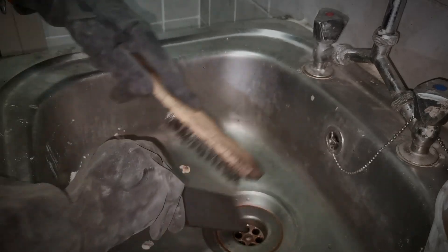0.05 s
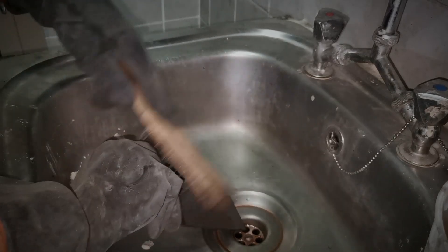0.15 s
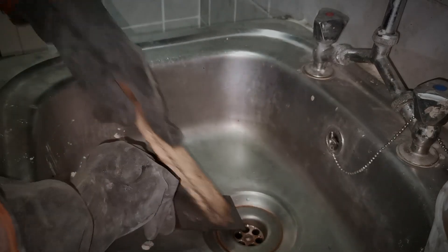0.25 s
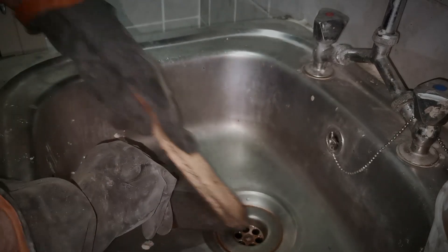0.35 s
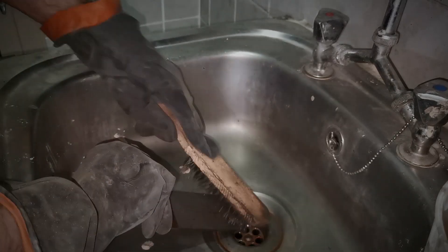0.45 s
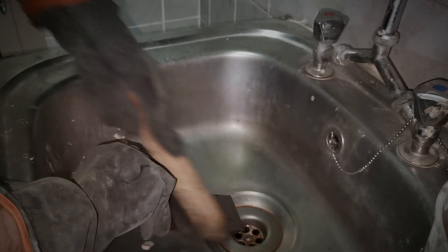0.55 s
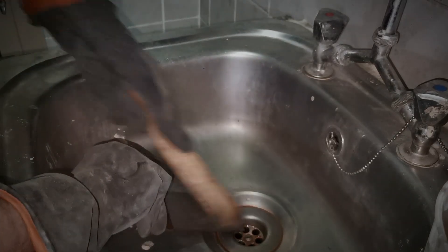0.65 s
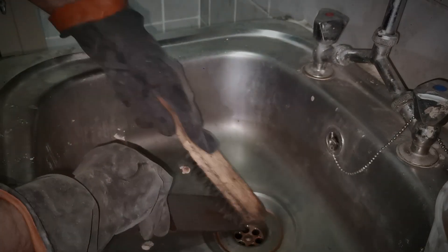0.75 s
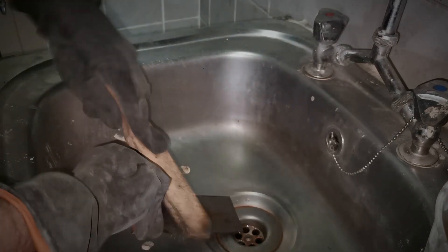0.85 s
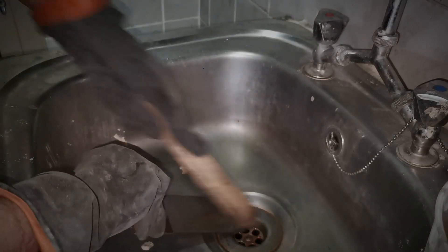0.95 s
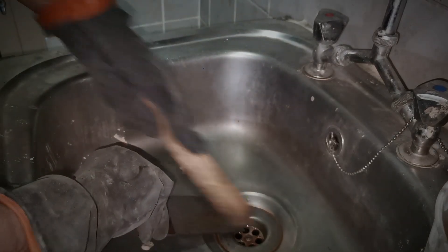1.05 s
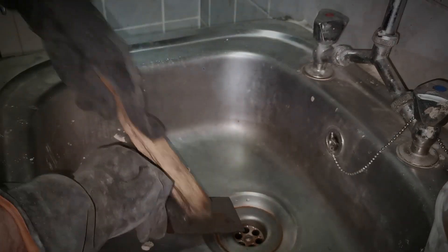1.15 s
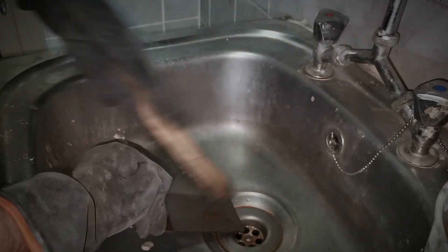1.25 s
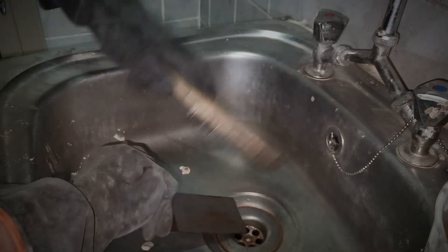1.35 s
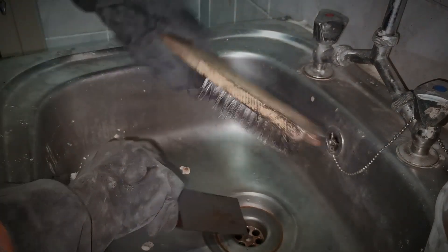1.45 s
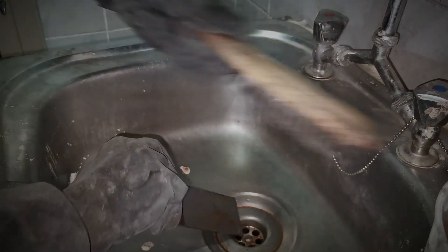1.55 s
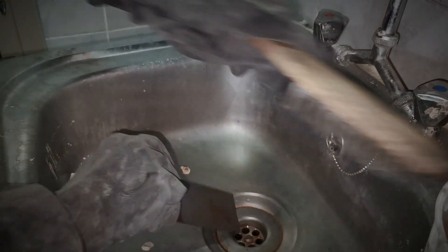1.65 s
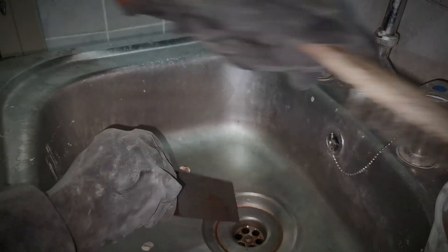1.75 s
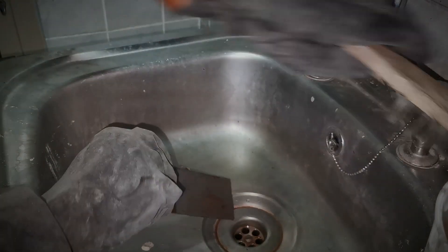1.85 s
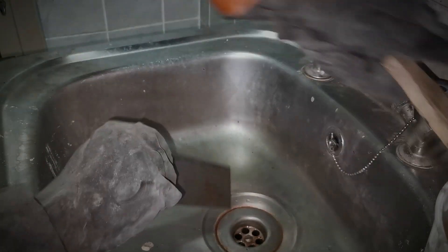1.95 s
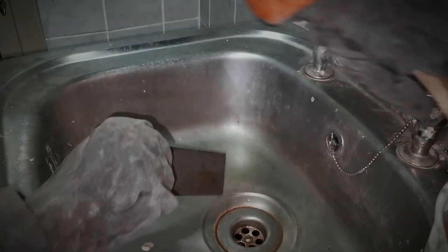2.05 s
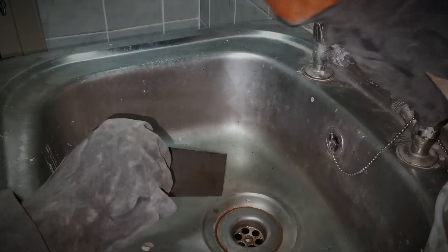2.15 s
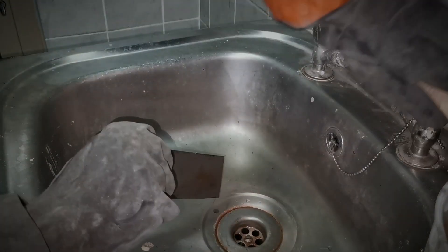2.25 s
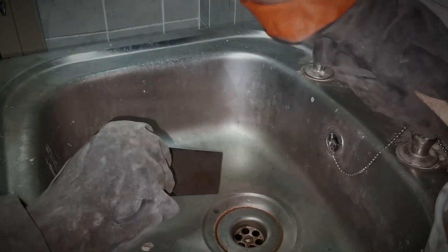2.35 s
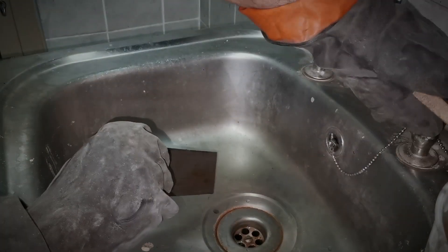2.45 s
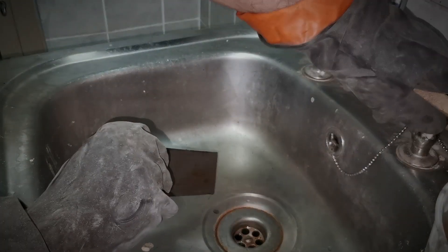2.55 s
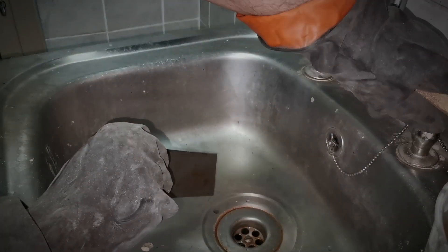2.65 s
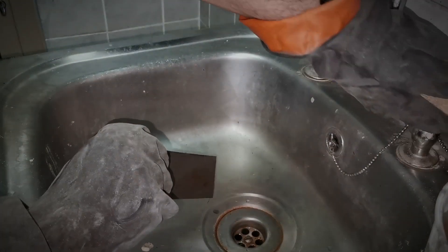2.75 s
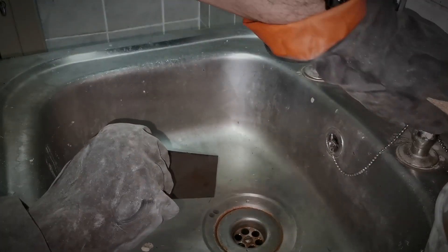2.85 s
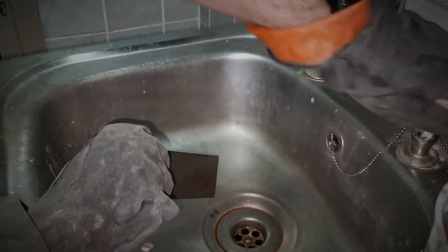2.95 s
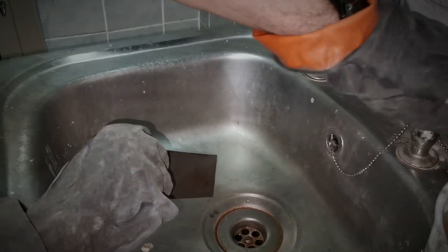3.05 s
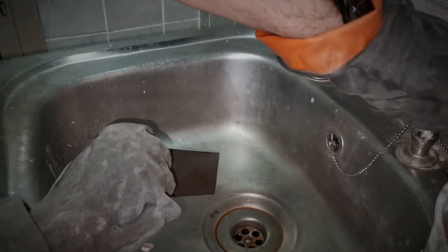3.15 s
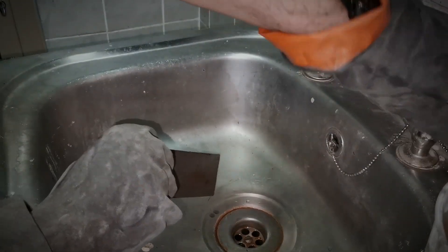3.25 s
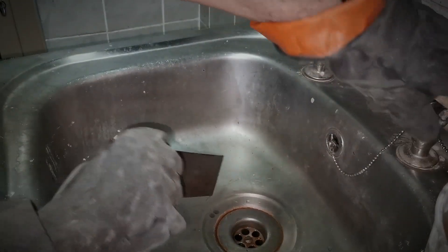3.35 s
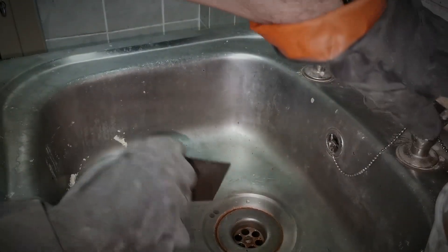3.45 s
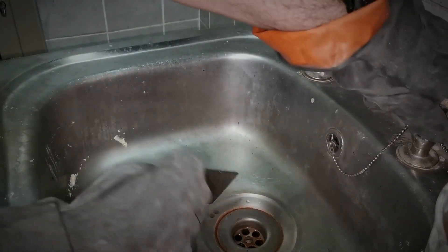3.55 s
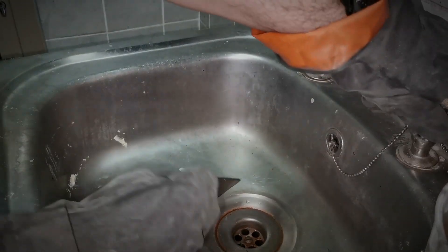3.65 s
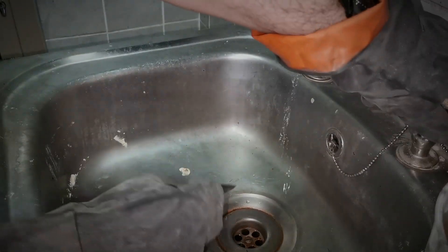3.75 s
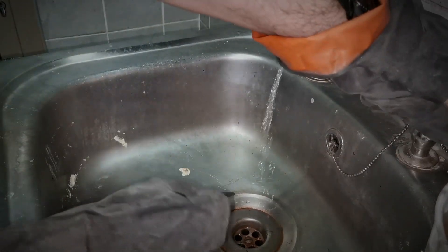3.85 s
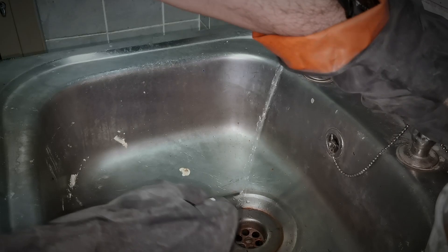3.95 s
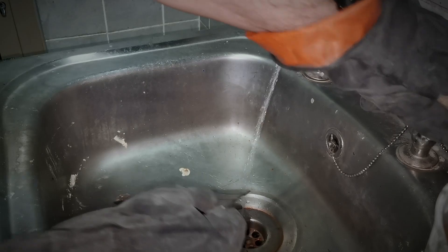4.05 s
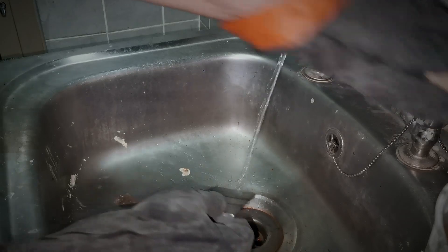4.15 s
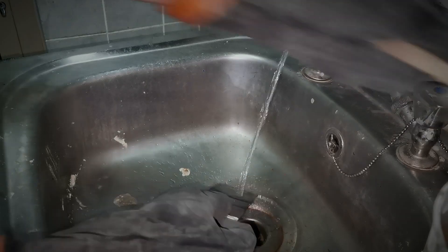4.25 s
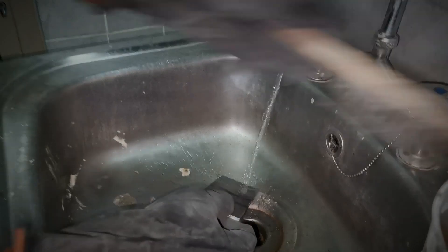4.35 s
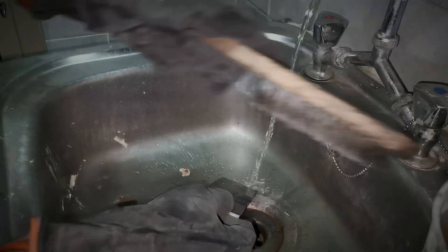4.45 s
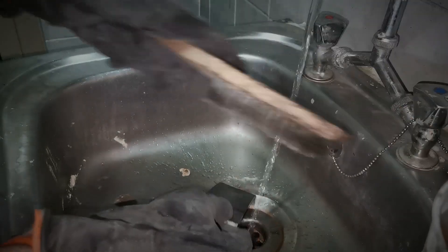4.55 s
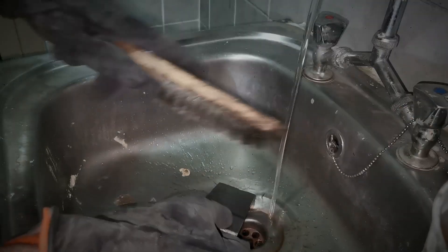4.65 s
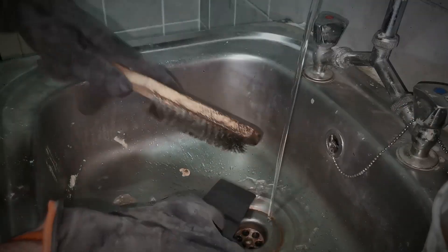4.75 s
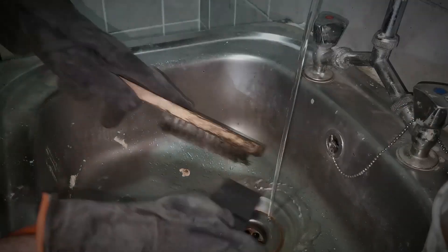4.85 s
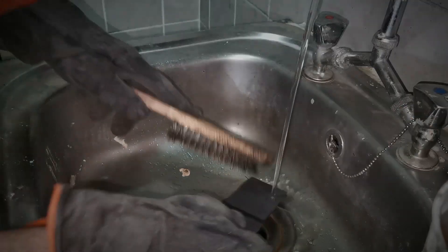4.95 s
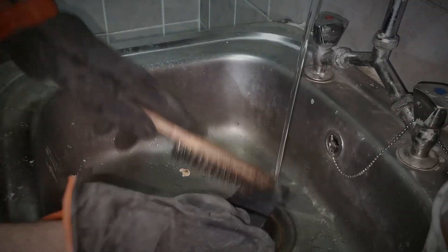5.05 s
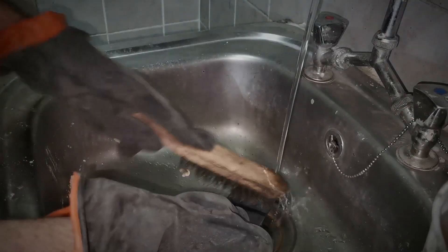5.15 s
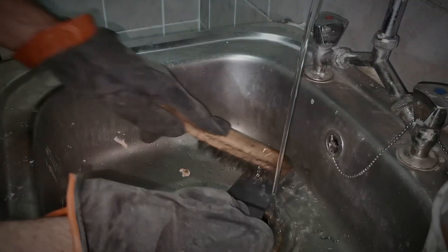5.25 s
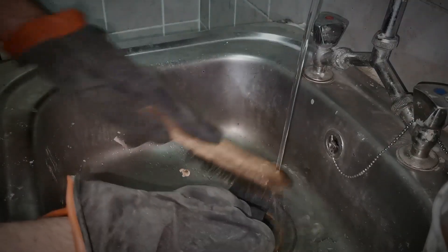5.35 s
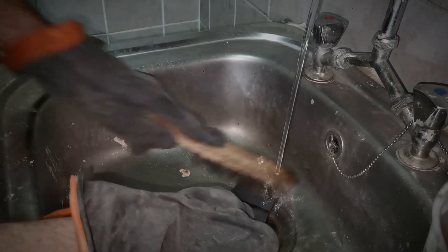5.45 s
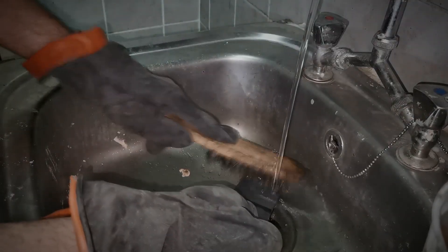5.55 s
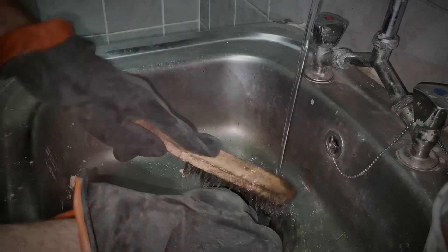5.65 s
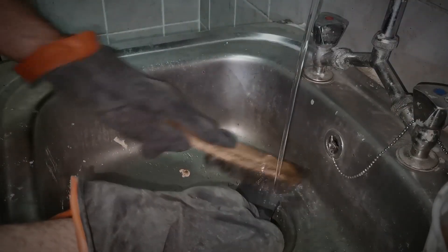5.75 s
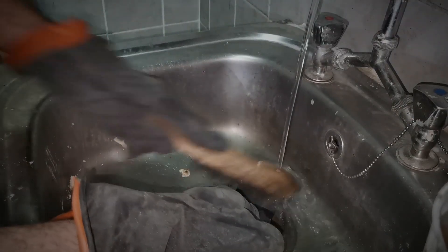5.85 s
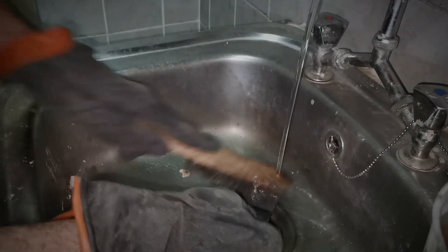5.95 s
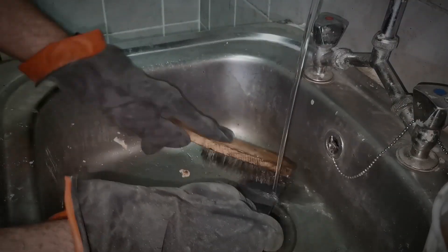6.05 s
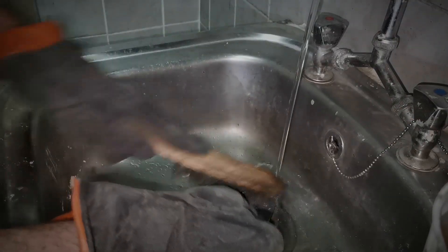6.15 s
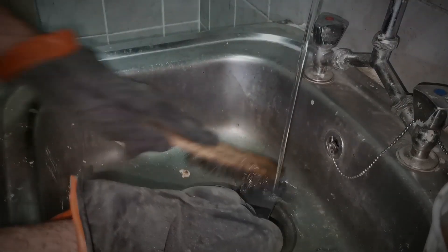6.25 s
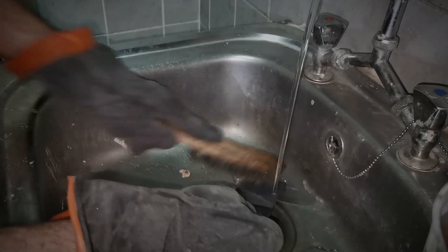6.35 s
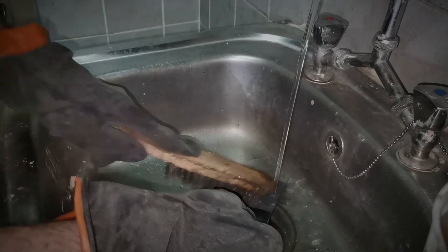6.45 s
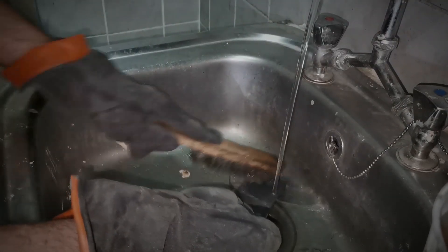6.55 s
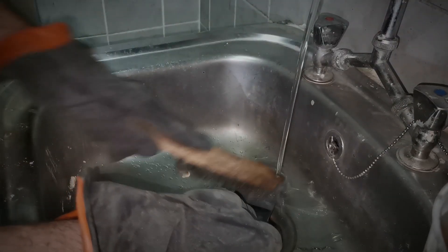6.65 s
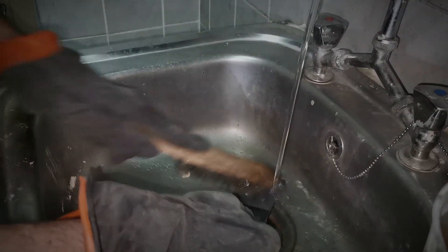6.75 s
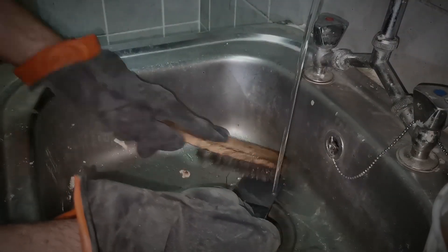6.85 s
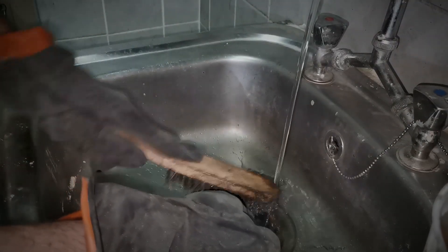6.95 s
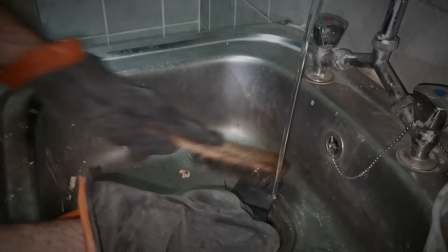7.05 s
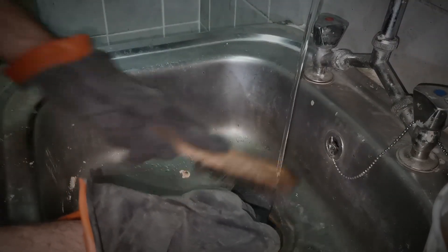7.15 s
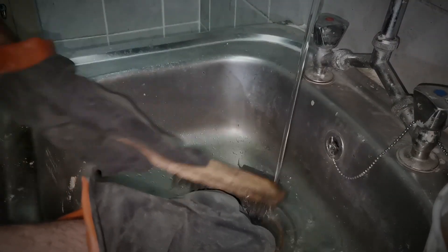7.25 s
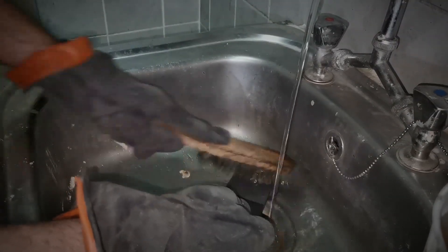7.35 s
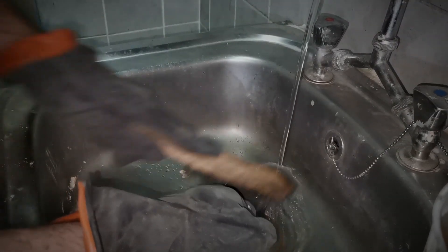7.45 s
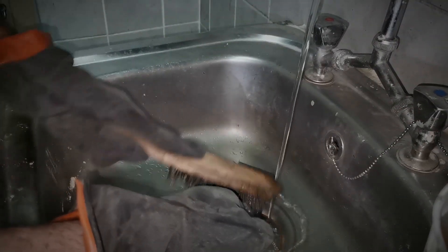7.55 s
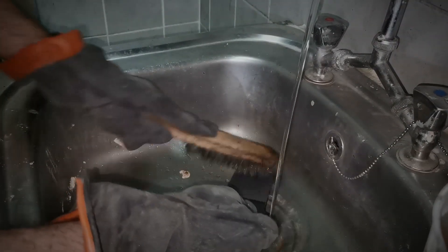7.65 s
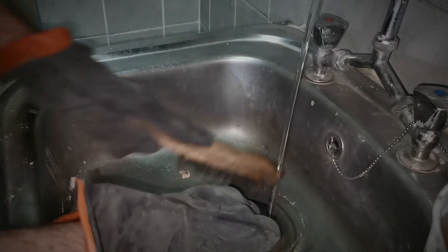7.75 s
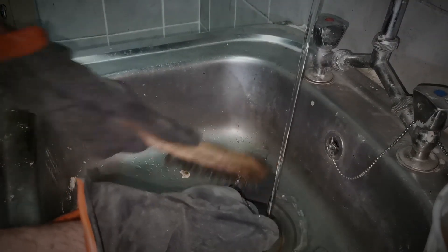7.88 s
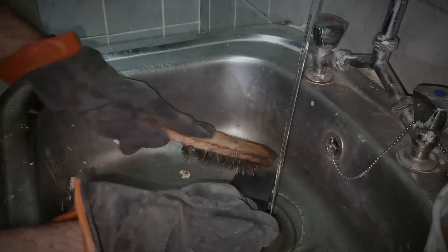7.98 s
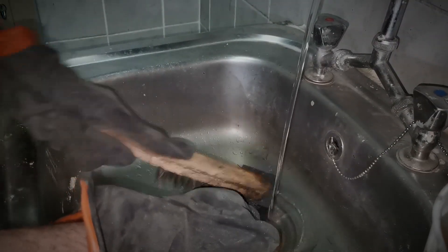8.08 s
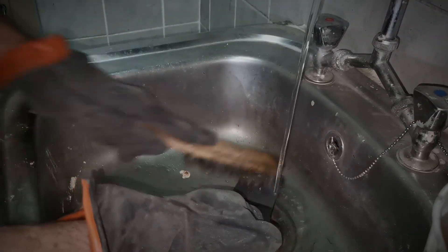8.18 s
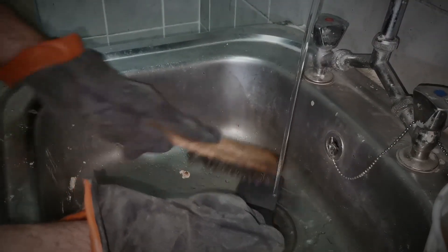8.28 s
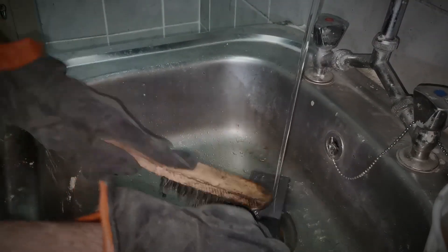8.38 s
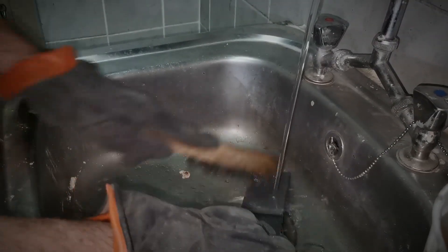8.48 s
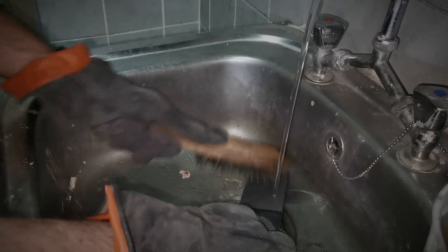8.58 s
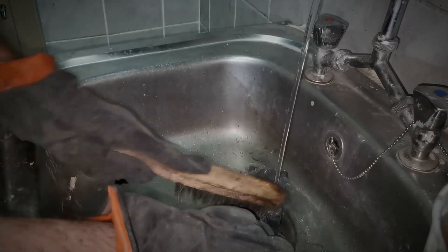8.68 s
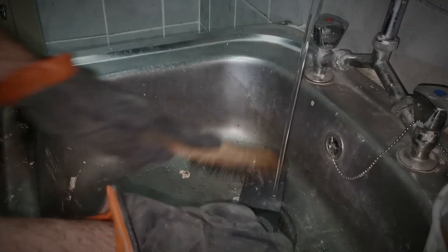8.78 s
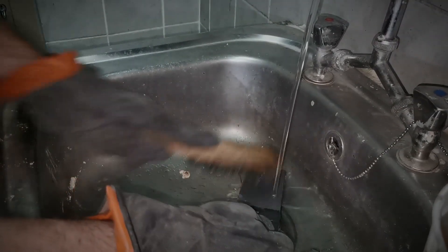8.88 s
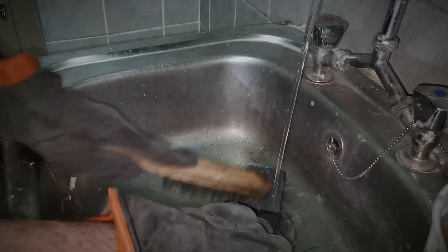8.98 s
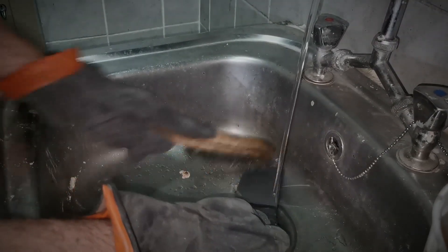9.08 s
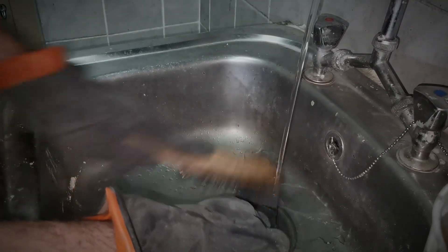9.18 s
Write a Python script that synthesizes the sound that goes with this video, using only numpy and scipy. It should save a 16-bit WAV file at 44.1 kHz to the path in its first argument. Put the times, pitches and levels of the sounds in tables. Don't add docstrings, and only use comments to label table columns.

```python
import sys
import numpy as np
from scipy import signal
from scipy.fft import rfft, irfft
from scipy.io import wavfile
from scipy.ndimage import uniform_filter1d

SR = 44100
rng = np.random.default_rng(int(sys.argv[2]) if len(sys.argv) > 2 else 0)


def volts_from_decibels(level):
    exponent = np.asarray(level, float) / 20
    return 10 ** exponent


def put_to_file(sound):
    columns = np.atleast_2d(sound).T
    safe = np.clip(columns, -1, 1)
    whole_steps = np.round(safe * 32767)
    wavfile.write(sys.argv[1], SR, whole_steps.astype(np.int16))


N = 406602
FREQ = np.fft.rfftfreq(N, 1 / SR)
TIME = np.arange(N) / SR
STREAM_ON_S = 5.25


def unit(x):
    return x / np.sqrt(np.mean(x ** 2, axis=-1, keepdims=True))


def on_log(table):
    hz, *columns = np.transpose(table)
    return np.array([np.interp(np.log(FREQ + 1), np.log(hz), c) for c in columns])


def band(x, lo_hz, hi_hz):
    return signal.sosfilt(signal.butter(3, [lo_hz, hi_hz], "bandpass", fs=SR, output="sos"), x)


def panned(pan_db):
    return np.array([[pan_db], [-pan_db]]) / 2


def walk(rate, channels=1, size=N):
    k = max(int(SR / rate), 1)
    steps = np.repeat(rng.standard_normal((channels, size // k + 1)), k, axis=1)[:, :size]
    return unit(uniform_filter1d(uniform_filter1d(steps, k), k))


def swells(table, rise, fall):
    out = np.zeros((len(table[0]) - 3, N))
    for t0, top, t1, *db in table:
        t1 = max(t1, top + .03)
        span = slice(int(t0 * SR), int(t1 * SR))
        up = np.clip((TIME[span] - t0) / max(top - t0, 1 / SR), 0, 1)
        down = np.clip((TIME[span] - top) / (t1 - top), 0, 1)
        shape = np.sin(np.pi / 2 * up) ** rise * np.cos(np.pi / 2 * down).clip(0) ** fall
        out[:, span] = np.maximum(out[:, span], volts_from_decibels(np.array(db))[:, None] * shape)
    return out


# (pitch [Hz], side minus mid [dB])
PORT_DIFFERENCE = [(60, -14), (110, -18), (200, -16.5), (380, -5), (700, -7.5), (1290, 3.5), (2380, -3),
                   (4400, -0.5), (8120, -17), (15000, 0)]


def widen(mid, other):
    side = irfft(rfft(other) * volts_from_decibels(on_log(PORT_DIFFERENCE)[0]), N)
    return np.array([mid + side, mid - side]) * volts_from_decibels(panned(-0.54))


def mottle(x, db, size=(7, 4)):
    spec = signal.stft(x, nperseg=512)[2]
    patches = uniform_filter1d(rng.standard_normal(spec.shape), size[0], axis=2)
    patches = uniform_filter1d(patches, size[1], axis=1)
    return signal.istft(spec * volts_from_decibels(db * patches / patches.std()), nperseg=512)[1][:, :N]


# (pitch [Hz], left [dB], right [dB])
PORTS = [(1190, 6, 9.5), (2740, -2.5, -1.5), (3660, -9, 0.5), (5070, -1.5, 5), (6190, -2, 0),
         (6810, -42, 6.5), (7500, -6, 8), (8600, -2.5, -3), (8860, 7, -10), (10500, 7.5, -7),
         (12040, 5, -2.5), (13700, -1.5, -1.5), (14500, 3, 4), (15900, 5.5, -0.5)]
# (pitch [Hz], width [Hz], level [dB])
BRISTLES = [(8800, 180, 1.5), (10800, 380, 2.5), (6600, 90, 2)]


def slips(share=.25, spread_db=0.5, patchy_db=1.6, mottle_db=3.0, cloth_db=0.):
    clicks = (rng.random((2, N)) < share) * rng.standard_normal((2, N))
    clicks = clicks * volts_from_decibels(spread_db * rng.exponential(size=(2, N)).clip(0, 5.0))
    colour = on_log(PORTS)
    for hz, width, db in BRISTLES:
        colour = colour + db / (1 + (2 * (FREQ - hz) / width) ** 2)
    colour = colour + cloth_db / (1 + ((FREQ - 4800) / 900) ** 2)
    patchy = mottle(clicks * volts_from_decibels(patchy_db * walk(120)), mottle_db)
    tips = irfft(rfft(patchy) * volts_from_decibels(colour), N)
    return unit(band(tips, 5850, 14640)), unit(band(tips, 2200, 4250))


def shaken(modes, wander_db, lo_hz, hi_hz, rumble_db, steady=0.7, size=32):
    swing, coarse = 0, TIME[::size]
    for hz, db, t60 in modes:
        a, b = walk(size * 8.5 / t60, channels=2, size=len(coarse))
        favour_db = wander_db * walk(size * 11, size=len(coarse))[0]
        gain = volts_from_decibels(db + favour_db) / (np.hypot(a, b) + 0.3) ** steady
        phasor = np.interp(TIME, coarse, gain * (a + 1j * b))
        swing = swing + (phasor * np.exp(2j * np.pi * hz * TIME)).real
    rumble = unit(band(rng.standard_normal(N), lo_hz, hi_hz))
    swing = unit(unit(swing) + volts_from_decibels(rumble_db) * rumble)
    return np.array([swing, np.roll(swing, N // 2)])


# (pitch [Hz], level [dB], t60 [s])
DRUM = [(140, 1.5, .3), (71, -20, 0.15)]
WALL = [(197, -34, 0.19), (216.6, 2.5, 0.27), (246, 0, 0.2), (275, -7, 0.17), (297, -2, 0.32)]
RIM = [(414.3, 11.7, 0.35), (486, 1.4, 0.21), (541.5, 4.2, 0.2)]
TAP = [(641.6, -3.5, 0.26), (709, 1.5, 0.15), (850, -16, 0.22), (890, -10.5, 0.18), (980, -11.5, 0.32),
       (1117, -14.5, 0.22)]


def shaken_basin():
    dry_db, wet_db, climb_db_s = -2, -15, 3
    tap_db = np.where(TIME < STREAM_ON_S, dry_db, wet_db + climb_db_s * (TIME - STREAM_ON_S))
    high = volts_from_decibels(tap_db) * shaken(TAP, 5.5, 611, 785, -4.5)
    drum = shaken(DRUM, 0.87, 44, 160, -28)
    lower = 0.78 * shaken(WALL[:3], 2.1, 144, 275, -10.0)
    upper = 0.63 * shaken(WALL[3:], 1.17, 250, 366, -8.5)
    return [drum, lower, upper, 0.85 * (shaken(RIM, 3.8, 386, 560, -3.0) + high)]


# (pitch [Hz], level [dB per Hz])
ROOM = [(12, -11), (20, -3.5), (43, -4), (68, -8.5), (86, -8.5), (142, -3.5), (168, -12), (367, -23),
        (738, -28), (1150, -30.5), (2530, -37), (2990, -46.5), (16000, -57)]


def room():
    air = irfft(rfft(rng.standard_normal((2, N))) * volts_from_decibels(on_log(ROOM)), N)
    return volts_from_decibels(-45.5 + 0.13 * walk(4.7)) * widen(*unit(air))


# (time [s], glove rustle [dB], basin murmur [dB])
HANDS = [(0., -56.5, -49), (1.44, -55.5, -38), (1.73, -54, -45), (1.92, -60, -96), (2.35, -62, -34),
         (2.66, -69.5, -47.5), (2.93, -67.5, -64), (3.389, -58.5, -43), (3.55, -71, -48),
         (3.87, -63.5, -43), (4.05, -57.5, -47), (4.21, -54, -38.5), (4.4, -46, -65), (4.59, -57, -67),
         (4.75, -45.5, -37), (4.9, -52, -49), (5.08, -53, -51), (5.3, -42, -45)]
# (start [s], fastest [s], end [s], rustle [dB], left minus right [dB])
RUBS = [(2.107, 2.093, 2.26, -42, 1), (2.153, 2.335, 2.55, -39.5, 0), (2.52, 2.511, 2.6, -49.5, -4),
        (2.598, 2.601, 2.65, -46.5, 4), (3.377, 3.384, 3.43, -42, -3), (3.452, 3.473, 3.55, -44, 0),
        (3.54, 3.62, 3.79, -48, 1), (4.083, 4.095, 4.2, -49, 10), (4.142, 4.158, 4.21, -45.5, 6),
        (4.364, 4.403, 4.51, -32.5, 0.5), (4.795, 4.794, 4.9, -37, -2), (5.23, 5.255, 5.3, -38, 8)]


def handling(basin):
    rasp, scrape = slips(share=.3, spread_db=2.0, patchy_db=2.0, mottle_db=1.0, cloth_db=3.5)
    s, *levels = np.transpose(HANDS)
    fade_db = 400 * (TIME - s[-1]).clip(0)
    hiss_db, murmur_db = (np.interp(TIME, s, c) - fade_db for c in levels)
    rows = []
    for *t, db, pan_db in RUBS:
        scuff_db = -58 + 1.76 * (db + 42.5)
        rows.append((*t, db + pan_db / 2, db - pan_db / 2, scuff_db))
    rub = swells(rows, rise=.5, fall=2.5)
    rustle = np.hypot(volts_from_decibels(hiss_db + panned(3)), rub[:2])
    scuff = np.hypot(volts_from_decibels(hiss_db - 5), rub[2])
    murmur = volts_from_decibels(-15.5) * basin[3] + 0.15 * basin[0] + 0.36 * (basin[1] + basin[2])
    return rustle * rasp + scuff * scrape + widen(*volts_from_decibels(murmur_db) * murmur)


# (start [s], hardest [s], end [s], level [dB])
GRINDS = [(0., .01, 0.062, -53), (1.97, 1.99, 1.6, -49.5), (2.2, 2.4, 2.54, -53.5),
          (2.645, 2.655, 2.7, -51.5), (3.1, 3.108, 3, -32), (3.59, 3.66, 3.86, -49),
          (3.97, 3.985, 3.82, -44), (4.39, 4.43, 4.47, -42.5), (4.97, 4.99, 5.13, -48),
          (5.15, 5.2, 5.3, -38), (7.25, 7.32, 7.9, -43), (7.42, 7.46, 6.5, -48), (7.57, 7.64, 7.81, -43.5),
          (7.88, 7.93, 8, -46), (8.16, 8.22, 7.7, -46)]


def grinds():
    grit = rng.standard_normal((2, N)) * volts_from_decibels(2.2 * walk(90))
    return swells(GRINDS, rise=0.86, fall=5.0) * unit(band(grit, 850, 2400))


# (start [s], length [s], floor drum [dB], wall [dB], rim [dB])
SLIDES = [(0.221, 0.17, -31, -37, -40), (0.488, 0.13, -37.5, -27, -48), (1.454, 0.35, -73, -48, -51.5),
          (2.11, 0.16, -72, -46, -49.5), (2.247, 0.1, -66, -40.5, -62), (2.646, 0.13, -31.5, -68, -42),
          (3.06, 0.16, -28.5, -44, -64), (3.098, 0.046, -40, -27, -28), (3.178, 0.37, -36, -66, -78),
          (3.637, 0.17, -40, -59, -44), (3.973, 0.096, -59, -36, -44), (4.08, 0.19, -49, -45, -66),
          (4.417, 0.11, -37, -33, -37.5), (4.656, 0.13, -60, -53, -33.5), (4.973, 0.13, -51, -45, -39.5),
          (5.14, 0.28, -32.5, -36.5, -39)]


def slides():
    rows = []
    for s, long, drum_db, wall_db, rim_db in SLIDES:
        rows.append((s, s + 0.079 * long, s + long, drum_db, wall_db, wall_db, rim_db))
    return swells(rows, rise=1.0, fall=1.8)


# (time [s], level [dB], modes (pitch [Hz], level [dB], t60 [s]))
RINGS = [
    (0.224, -12.5, [(141, -1, 0.5), (226.5, 0.5, 0.15), (306, -3.5, 0.27), (400, -16, 0.27), (718, -7, 0.24), (820, -15.5, 0.22)]),
    (0.2257, -24.5, [(7084, -4, 0.06), (9000, 9.5, 0.026), (13700, -7, 0.085)]),
    (2.649, -39.5, [(463, 4, 0.38), (830, -1, 0.19), (896, -1, 0.19)]),
    (3.102, -17, [(375, -23, 0.41), (444, -16, 0.21), (602, 10.5, 0.028), (728, -15, 0.24), (826, -9.5, 0.24), (1030, -5, 0.057), (1170, -11, 0.13), (1480, -13, 0.17), (2000, -19, 0.17)]),
    (3.1135, -11, [(683, 2, 0.03)]),
    (3.604, -23, [(595, -9, 0.19), (790, -4, 0.037), (1553, -25, 0.34)]),
    (3.972, -23, [(222.7, 2.5, 0.15), (524, -16, 0.31), (688, -19, 0.42)]),
    (4.646, -13, [(144, 2, 0.089), (224.4, 4.5, 0.23), (320, -3, 0.2), (412, -8.5, 0.41), (733, -10, 0.21), (860, -20.5, 0.26), (1367, -24.5, 0.24), (2207, -20, 0.19)]),
    (5.1385, -17.5, [(144, 2, 0.12), (225, -21, 0.71), (292, 2.5, 0.17), (418, -2.5, 0.23), (1110, -19.5, 0.44), (2180, -22.5, 0.45)]),
]


def rings(size=SR // 2):
    smear_hz = 28
    out, t = np.zeros((2, N + size)), np.arange(size) / SR
    for s, db, modes in RINGS:
        hz, level_db, t60 = np.transpose(modes)
        steps = rng.standard_normal((len(hz), size)).cumsum(axis=1)
        drift = np.sqrt(2 * np.pi * smear_hz / SR) * hz[:, None] / 1000 * steps
        waves = np.sin(2 * np.pi * hz[:, None] * t + uniform_filter1d(drift, size=40))
        waves = waves * np.exp(-np.log(1000) * t / t60.clip(.02, .6)[:, None])
        signs = np.array([-np.ones(len(hz)), np.sign(rng.standard_normal(len(hz)))])
        attack = (1 - np.exp(-t / 0.001)) * (1 + 0.55 * np.exp(-t / 0.012))
        out[:, int(s * SR):][:, :size] += (signs * volts_from_decibels(db + level_db)) @ waves * attack
    return out[:, :N]


def ring(x, modes, gains, detune):
    out = 0
    for (hz, db, t60), gain, shift in zip(modes, gains, detune):
        pole = np.exp(2j * np.pi * hz * shift / SR - np.log(1000) / (t60 * SR))
        out = out + volts_from_decibels(db) * gain * signal.lfilter([1], [1, -pole], x).imag
    return out


# (pitch [Hz], level [dB], t60 [s])
CLANK = [(1270, 4, 0.09), (1467, 4, 0.09), (1777, 4, 0.07), (1950, 9, 0.03), (2290, 10, 0.03),
         (3300, 6, .04)]
# (time [s], basin [dB], tap [dB], clank [dB], crack [dB])
BLOWS = [
    (0.222, -7, -23, -27, -18.5),
    (0.327, -18, -68, -62, -42.5),
    (1.979, -85, -41, -46, -55),
    (2.645, -42, -39, -42, -59),
    (3.1017, -20.5, -13, -28.5, -45.5),
    (3.603, -34, -20.5, -48, -61),
    (3.971, -17, -45, -36, -44),
    (4.645, -6.5, -23, -17.5, -21.5),
    (5.137, -10, -25, -17, -28),
]
# (time [s], basin [dB], rim [dB], tap [dB], clank [dB])
BUMPS = [(0.612, -15, -59, -41, -59), (1.025, -14, -37, -40, -41), (3.061, -28, -55, -59, -62),
         (3.639, -38, -52, -42, -44), (4.977, -33, -49, -52, -35.5), (5.829, -31, -32, -49, -54),
         (6.073, -25, -29, -44, -41), (6.47, -33, -55, -36.5, -43), (6.692, -19, -33, -28.5, -38.5),
         (6.985, -47, -43, -36, -41), (7.146, -26, -28.5, -57, -52), (7.244, -19, -25.5, -39, -51),
         (1.192, -18, -48, -60, -55)]


def knocks(size=SR // 3):
    thuds, cracks, t = np.zeros((2, N + size)), np.zeros((2, N + size)), np.arange(size) / SR
    # modes, low edge [Hz], high edge [Hz], clatter share, extra snap
    groups = ((DRUM + WALL, 110, 360, .2, 1.6), (RIM, 360, 620, .5, 1.8),
              (TAP, 520, 1150, .9, 3.0), (CLANK, 1000, 4600, 2.5, 2.2))
    blows = [(s, low, -11 + 0.3 * low + 0.37 * tap, tap, *high) for s, low, tap, *high in BLOWS]
    for s, *levels, crack_db in blows + [(*row, -74) for row in BUMPS]:
        blow = (t == 0) + 0.06 * rng.standard_normal((2, size)) * np.exp(-t / 0.015)
        sound = 0
        for db, (modes, lo_hz, hi_hz, clatter, snap) in zip(levels, groups):
            luck = rng.standard_normal((3, len(modes)))
            gains, detune = volts_from_decibels(2.0 * luck[0]), 1 + 0.013 * luck[1]
            mid = ring(blow[0], modes, -gains, detune)
            other = ring(blow[1], modes, gains * np.sign(luck[2]), detune)
            part = unit(np.array([mid, other]))
            fade_s = 0.041 * (600 / lo_hz) ** 0.86
            dense = unit(rng.standard_normal((2, size)) * np.exp(-t / fade_s))
            dense = signal.lfilter([1], [1, -np.exp(-2 * np.pi * lo_hz / SR)], dense)
            part = (1 + snap * np.exp(-t / 0.0075)) * part + clatter * unit(band(dense, lo_hz, hi_hz))
            part = band(part, lo_hz * 1.185, hi_hz * 1.06)
            sound = sound + volts_from_decibels(db) * part / abs(part).max(axis=1, keepdims=True)
        crack = band(rng.standard_normal((2, size)), 2200, 10500)
        crack = crack * (np.exp(-t / 0.01) + 0.58 * np.exp(-t / 0.025))
        start = int((s + 0.0017) * SR)
        thuds[:, start:start + size] += sound
        cracks[:, start:start + size] += volts_from_decibels(crack_db + 0.5) * crack
    crack = irfft(rfft(cracks[:, :N]) * volts_from_decibels(0.91 * on_log(PORTS)), N)
    return widen(*thuds[:, :N] + band(rings(), 104, 15000)) + crack


# (start [s], length [s], level [dB])
BOOMS = [
    (.23, 0.24, -40),
    (3.074, 0.19, -37),
    (3.96, 0.1, -37),
    (4.412, 0.17, -35),
    (4.65, 0.15, -32),
    (5.446, 0.11, -31),
    (7.235, 0.11, -32),
    (8.741, 0.11, -28),
]


def booms():
    gain = swells([(s, s + 0.078 * long, s + long, db) for s, long, db in BOOMS], rise=0.6, fall=1.4)
    return gain * unit(band(rng.standard_normal(N), 50, 88))


# (time [s], level [dB], pitch [Hz], t60 [s], left minus right [dB])
TICKS = [(2.1116, -33, 7500, 6.0, -12), (3.3878, -21.5, 10440, 0.62, 15), (3.8345, -33, 2120, 6.0, 11),
         (4.0367, -36, 12970, 0.065, 6), (4.085, -26, 10230, 0.34, 12), (4.1536, -33, 9900, 4.6, 14.5),
         (4.3316, -33, 10900, 0.37, 7), (4.3676, -23, 8400, 0.35, -8), (4.466, -24.5, 6000, 0.21, -9),
         (4.515, -24, 8150, 0.22, 4), (4.5294, -33, 6990, 0.36, -6), (4.747, -30, 10500, 0.22, 15),
         (4.779, -16, 7800, 0.072, 2), (4.801, -6.5, 5000, 0.19, -1), (5.075, -33, 10800, 6.0, 12),
         (.328, -34, 11000, .1, 7), (4.345, -29, 13500, .05, 2), (4.555, -26, 13800, .15, 4),
         (4.736, -29, 4500, .1, -6), (7.192, -18.5, 2860, .06, -1)]
# (time [s], level [dB], pitch [Hz], t60 [s], left minus right [dB])
CATCHES = [
    (0.6135, -16, 9300, 0.1, 7),
    (0.745, -14, 7250, 0.1, 0),
    (5.3147, -20.5, 11300, 0.1, 7.5),
    (6.0726, -22, 10800, 0.1, 6),
    (7.8486, -21, 10700, 0.073, 4.5),
    (8.291, -16, 9100, 0.11, 8),
    (8.7203, -20, 10600, 0.085, 14),
]


def ticks(size=SR // 5):
    out, t = np.zeros((2, N + size)), np.arange(size) / SR
    for s, db, hz, t60, pan_db in TICKS + [(s, db + 0.5, *rest) for s, db, *rest in CATCHES]:
        noise = rng.standard_normal((2, size))
        burst = unit(band(noise, hz / 1.14, min(hz * 1.21, SR / 2.2)))
        tone = 0.8 * np.sin(2 * np.pi * hz * t)
        splash = 0.71 * min(hz / 5000, 1) ** 2 * unit(band(noise, 6300, 15300))
        decay = 1.33 * np.exp(-t / 0.0037) + 0.18 * np.exp(-np.log(1000) * t / np.clip(t60, .02, .2))
        out[:, int(s * SR):][:, :size] += 0.2 * volts_from_decibels(db + panned(pan_db)) * (burst + tone + splash) * decay
    return out[:, :N]


# (start [s], time to full speed [s], rasp [dB], floor drum [dB], wall [dB])
DRY = [
    (0.362, 0.15, -24.5, -51, -39),
    (0.607, 0.054, -20.5, -29, -28),
    (0.737, 0.024, -20.5, -48, -32),
    (0.871, 0.079, -22.5, -28.5, -27),
    (1.014, 0.053, -24, -34, -39),
    (1.187, 0.067, -22, -33, -29),
    (1.341, 0.024, -23, -42, -39),
]
PUSHES = [(5.428, 0.069, -24, -23.5, -34), (5.695, 0.031, -20, -23.5, -31.5),
          (5.952, 0.031, -20, -23.5, -31), (6.227, 0.055, -23, -26, -34.5),
          (6.494, 0.037, -22, -32.5, -36.5), (6.747, 0.047, -21.5, -32, -34), (6.999, 0.036, -20, -23, -30),
          (7.26, 0.029, -19.5, -31.5, -27.5), (7.547, 0.027, -19.5, -26.5, -28),
          (7.845, 0.045, -20.5, -33.5, -25.5), (8.137, 0.034, -19, -26.5, -25),
          (8.414, 0.07, -24, -35.5, -35), (8.713, 0.073, -23, -26, -36.5), (9.009, 0.06, -21, -34, -39.5)]
PULLS = [(5.304, 0.049, -28.5, -45, -41.5), (5.567, 0.073, -24, -32.5, -39),
         (5.816, 0.053, -21, -34, -32.5), (6.065, 0.044, -21, -34, -38), (6.342, 0.029, -23, -42, -42.5),
         (6.619, 0.049, -24, -31.5, -41), (6.879, 0.063, -22.5, -35, -39),
         (7.138, 0.049, -19.5, -27.5, -39), (7.402, 0.074, -18, -50, -27),
         (7.692, 0.065, -21.5, -36.5, -39.5), (7.992, 0.081, -23.5, -40, -50),
         (8.272, 0.054, -21.5, -35, -42.5), (8.561, 0.034, -25.5, -38, -42), (8.867, 0.047, -26, -46, -49),
         (9.125, 0.066, -26.5, -39.5, -46.5)]
# (left minus right [dB], its drift [dB/s], scrape [dB], rim [dB],
# rim of the first stroke [dB], its climb [dB/s])
DRY_HOLD = (0, 6.5, -37, -51.5, -41, 3.)
PUSH_HOLD = (6.5, 0, -41, -40, -48.5, 3)
PULL_HOLD = (6.5, 0.4, -41, -37, -46.5, 0.5)
# (upper minus lower wall [dB], extra rim [dB], extra scrape [dB], extra left minus right [dB])
GRIPS = [(2, -4, 6.5, 1), (0, -0.5, -1.5, 1.5), (-1, 8, 1.2, 2), (-2, -1, -3.5, 1.5), (9, -5, 5, 2),
         (-2, -0.5, -1, -2), (5, 2, 4, -2), (-2.5, 3.5, 5.5, 1), (-6.5, 3.5, 6.5, -3), (7, 3, 2.3, -0.3),
         (-1, 3., 3, 1.5), (0, -2, -11, 0), (-2, 2, -4, -3.5), (8, -2.5, -2.5, -0.5), (-10, 3, 3, 0.5),
         (0, 0.5, 0.5, 0), (3.5, 1.7, -2, -0.8), (-4.5, 0.2, -5, -1.5), (6.5, -10, -5, -2.5),
         (-0.7, -3, 3, -3), (-3.5, 1, 1.5, 0), (4, -9, -1, 0.5), (1, 3.5, 6, 0), (8.5, -3, 3.5, -3),
         (5, 0.5, 5.5, -3), (0, 5.5, 7, -1), (2, 3.5, 0, 0), (4., 2.5, -4, 0), (2, -11, -3, -4),
         (6, 2.5, -0.5, -3), (-6, 2.5, 1, -2.5), (8, 2, 7, -3), (2, 3, 7.5, -1), (5, 5, 5, -1),
         (4, -6, -12, -0.3), (5, 5, -9, -1.5)]
LAGS_MS = [1, 3, -5, 14, 12, 5, -2, 17, 22, 21, 5, 5, 3, 33, 25, 16, 22, 12, 7, 24, 1, 4, -3, 12, 1, 0, -2,
           4, 10, 15, -4, -4, -14, -4, -4, -2]


def strokes():
    lifts_s, turn_s = [1.436, 9.31], 0.013
    late_s, shake_s = 0.0026, 0.1
    stops = np.sort([row[0] for row in DRY + PUSHES + PULLS] + lifts_s)
    wires, shakes, grips = [], [], iter(zip(GRIPS, LAGS_MS))
    for rows, hold in ((DRY, DRY_HOLD), (PUSHES, PUSH_HOLD), (PULLS, PULL_HOLD)):
        pan_db, drift, scrape_db, rim_db, first_db, climb = hold
        for s, rise, rasp_db, drum_db, wall_db in rows:
            end, since = stops[stops > s][0] - turn_s, s - rows[0][0]
            (lean_db, ring_db, dig_db, turn_db), lag_ms = next(grips)
            left_db = rasp_db + turn_db / 2
            right_db = rasp_db - turn_db / 2 - pan_db - drift * since
            scrape = dig_db + scrape_db + 0.9 * (rasp_db + 21) + 0.65 * (wall_db + 27.0)
            rim = ring_db + min(rim_db, first_db + climb * since) + 0.39 * (wall_db + 40.0)
            wires.append((s, s + rise, end, left_db, right_db, scrape))
            jolt = s + late_s + max(lag_ms, 0) / 1000
            hardest = jolt + 0.51 * rise
            calm = min(end + late_s, jolt + shake_s)
            shakes.append((jolt, hardest, calm, drum_db, wall_db - lean_db / 2, wall_db + lean_db / 2, rim))
    return wires, shakes


def brush(basin):
    rasp, scrape = slips()
    wires, shakes = strokes()
    stroke = swells(wires, rise=0.52, fall=1.32)
    stroke = np.hypot(stroke, volts_from_decibels(-7.0) * uniform_filter1d(stroke, size=5000))
    push = swells(shakes, rise=0.52, fall=0.65)
    push = np.hypot(push, volts_from_decibels(-3.5) * uniform_filter1d(push, size=8000))
    push = np.hypot(push, slides())
    drumming = sum(gain * modes for gain, modes in zip(push, basin))
    return stroke[:2] * rasp + stroke[2] * scrape + widen(*drumming)


# (loudest [s], pitch [Hz], level [dB])
SINGS = [
    (0.799, 7140, -28),
    (.93, 9070, -31.5),
    (4.825, 4830, -41.5),
    (5.509, 7850, -35),
    (6.52, 7650, -34.5),
    (8.51, 6750, -36.5),
    (8.815, 7800, -33.5),
    (9.084, 7600, -30),
]


def sings():
    swell_s, width = 0.04, 1.035
    out = 0
    for s, hz, db in SINGS:
        gain = swells([(s - swell_s, s, s + swell_s, db)], rise=1.3, fall=2.1)
        out = out + gain * unit(band(rng.standard_normal(N), hz / width, hz * width))
    return irfft(rfft(out) * volts_from_decibels(1.2 * on_log(PORTS)), N)


def stream():
    grains = (rng.random((2, N)) < .05) * rng.standard_normal((2, N))
    grains = grains * volts_from_decibels(3 * walk(13).clip(-1, 1))
    fizz = unit(band(grains, 930, 6900)) + volts_from_decibels(-11.5) * unit(band(grains, 280, 1160))
    return volts_from_decibels(-46.5) * np.clip((TIME - STREAM_ON_S) / 0.19, 0, 1) * fizz


def scene():
    basin = shaken_basin()
    near = handling(basin) + grinds() + knocks() + booms() + ticks() + brush(basin) + sings() + stream()
    t = np.arange(SR // 4) / SR
    tail = rng.standard_normal((2, len(t))) * np.exp(-np.log(1000) * t / 0.14) * (t > .003)
    echo = signal.oaconvolve(band(near, 690, 13700), tail, axes=1)[:, :N]
    return near + volts_from_decibels(-30.0) * echo + room()


def low_pass(x):
    return signal.sosfilt(signal.butter(12, 17000, fs=SR, output="sos"), x)


def record(dry):
    cut = signal.ellip(10, .2, 70, 15850, fs=SR, output="sos")
    mix = signal.sosfilt(cut, np.tanh(.8 * dry) / .8)
    return low_pass(mix)


dry = scene()
out = record(dry)
put_to_file(out)
```